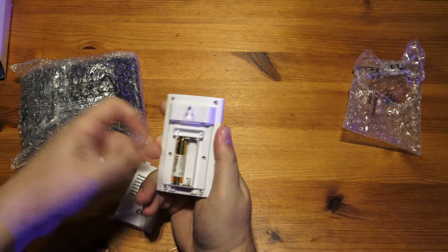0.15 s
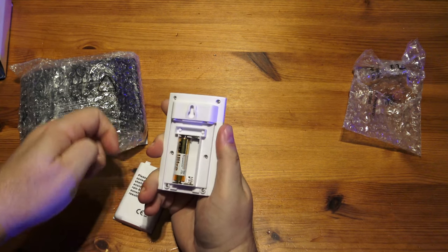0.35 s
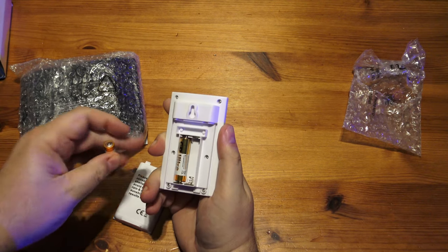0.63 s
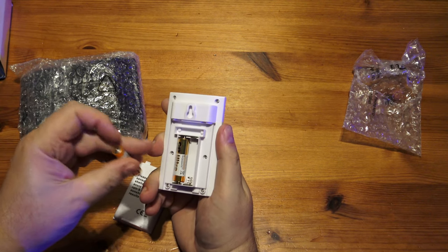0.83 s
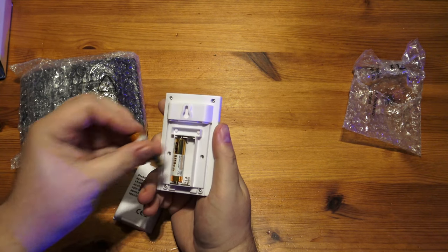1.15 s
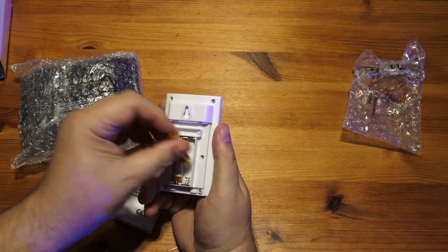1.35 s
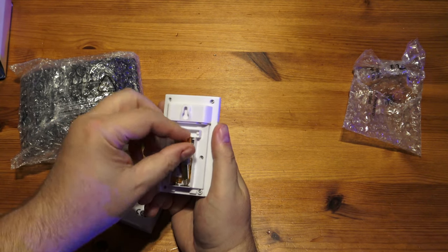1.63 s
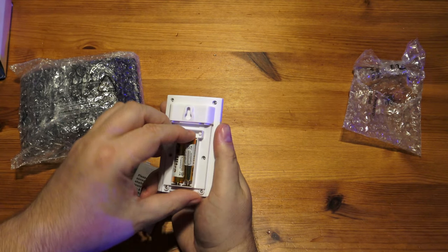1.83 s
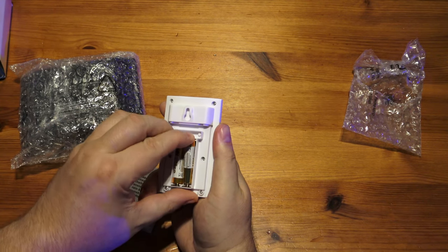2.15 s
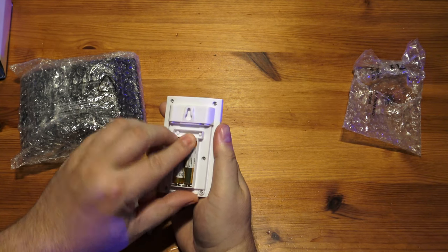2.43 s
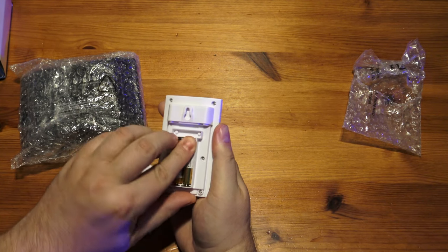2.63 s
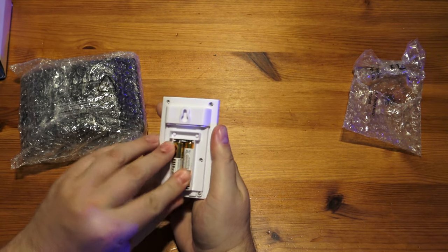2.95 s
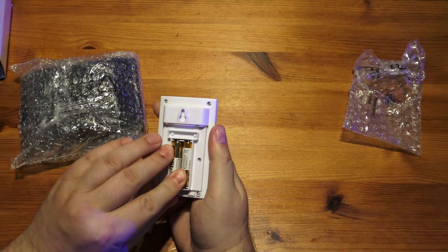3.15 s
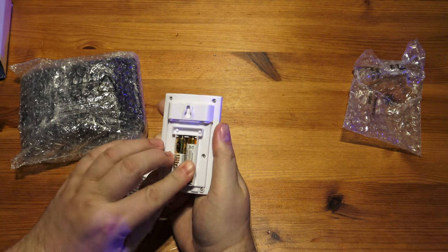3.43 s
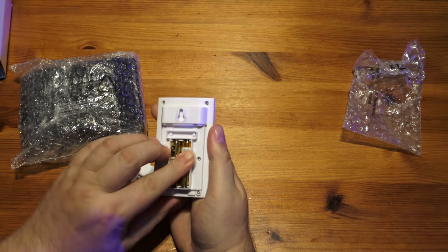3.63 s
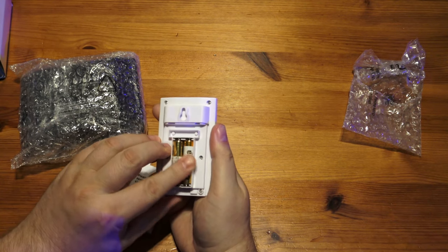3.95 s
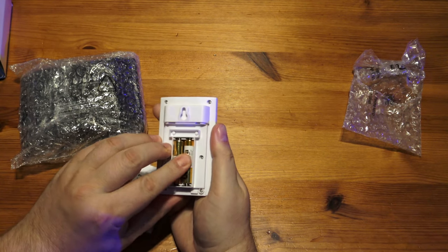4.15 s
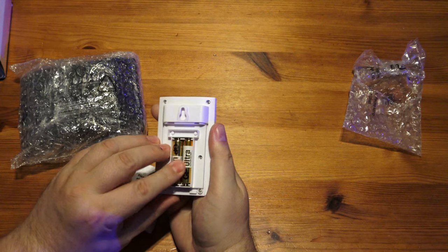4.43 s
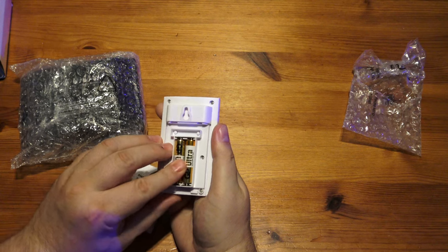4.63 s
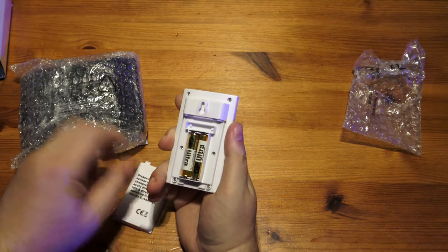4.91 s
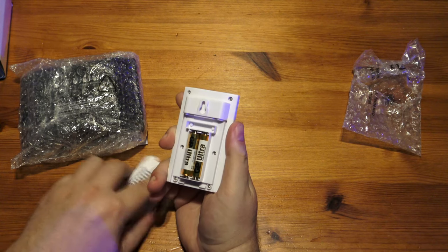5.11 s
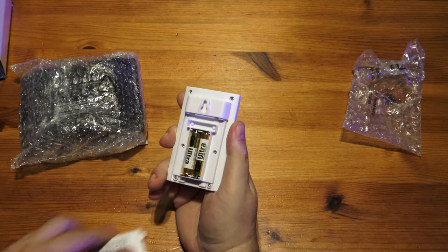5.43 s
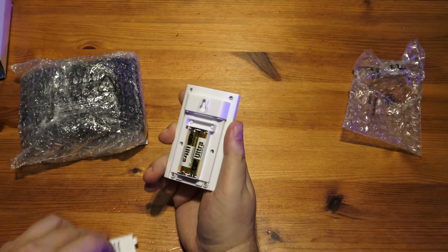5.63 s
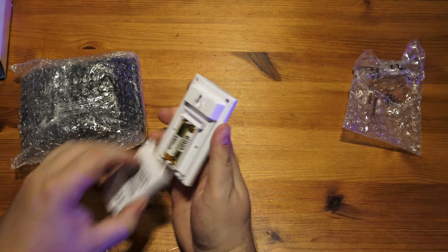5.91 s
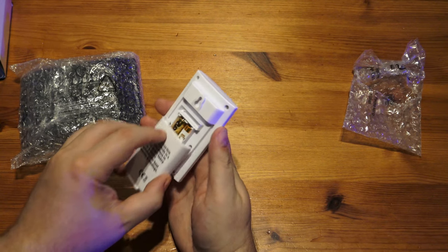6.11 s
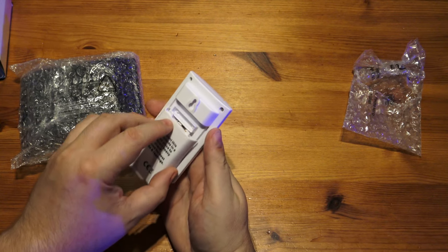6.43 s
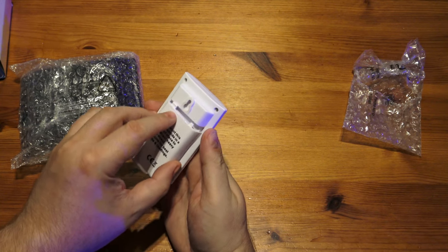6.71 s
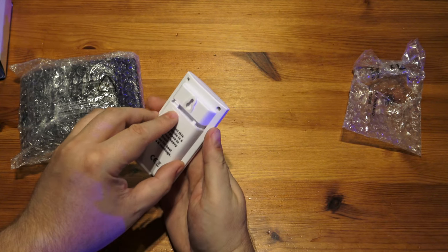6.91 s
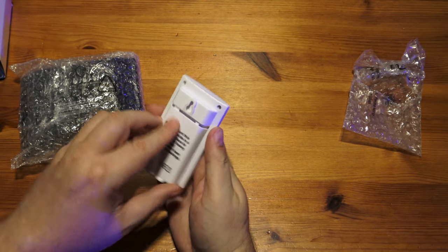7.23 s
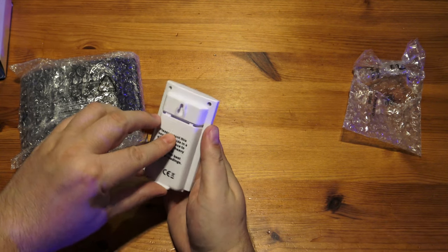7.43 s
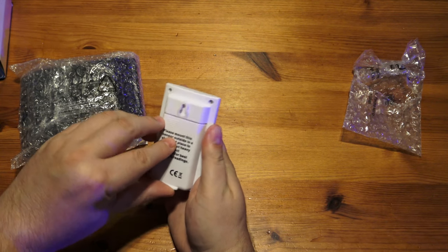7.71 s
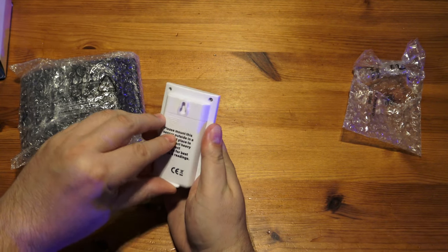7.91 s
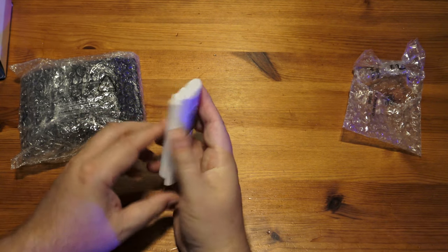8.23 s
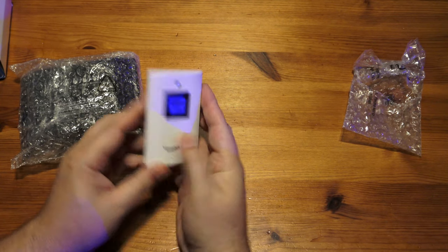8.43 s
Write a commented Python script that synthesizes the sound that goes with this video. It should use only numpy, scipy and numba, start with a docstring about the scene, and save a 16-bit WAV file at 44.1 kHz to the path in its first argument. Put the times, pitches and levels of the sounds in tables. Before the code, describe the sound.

In a small room, close to the microphone, hands press a battery into a light plastic case: a flurry of ticks, then hard, separate snaps and small scuffs. A loose cover knocks and drags grittily over the wooden table, is fitted with several sharp clicks, and settles with a last loud snap. Skin brushes softly; a quiet fan wavers behind, with short echoes.

```python
"""A wooden table in a small room: hands push a battery into a plastic case, drag its cover and snap it on.
Each contact is a short chatter of clicks that rings the plastic; the drag is gritty noise through its modes.
Skin and sleeves brush as patchy noise, a contact spring buzzes, fingers thump and a faint tone pings.
Decaying noise makes the room's echo; a fan wavers in the hush; a fast limiter holds down the loudest snaps."""
import sys
import numpy as np
from scipy import signal
from scipy.fft import rfft, irfft, next_fast_len
from scipy.io import wavfile
from scipy.ndimage import uniform_filter1d
from numba import njit

SR = 44100
rng = np.random.default_rng(int(sys.argv[2]) if len(sys.argv) > 2 else 0)


def transcribe(u):
    """Save the signal u as a 16-bit wav file named by the first command-line argument.

    u: samples, shape (n,) or (channels, n), limited to [-1, 1]; the rate is SR.
    q: integer samples, one column per channel.
    """
    v = np.clip(np.atleast_2d(u).T, -1, 1)
    q = np.round(v * 32767).astype(np.int16)
    wavfile.write(sys.argv[1], SR, q)


N = 377495  # length in samples
SECONDS = np.arange(N) / SR
LEFT_RIGHT = np.array([[1], [-1]])  # side signal: opposite sign in the two channels


def undb(db):
    """dB to gain."""
    return 10 ** (np.asarray(db) / 20)


def along(table, hz):
    """Read a (Hz, value) table on a log axis."""
    f, v = np.transpose(table)
    return np.interp(np.log(hz + 1), np.log(f), v)


def mode(hz, centre_hz, width_hz):
    """Complex response of one resonance, gain 1 at the centre."""
    return 1j * hz * width_hz / (centre_hz ** 2 - hz ** 2 + 1j * hz * width_hz)


def shaped(x, response):
    """Filter by a function of frequency."""
    size = next_fast_len(x.shape[-1])
    hz = np.arange(size // 2 + 1) * SR / size
    return irfft(rfft(x, size) * response(hz), size)[..., :x.shape[-1]]


@njit
def sweep(x, hz, damp):
    """Band-pass whose centre moves every sample."""
    y, band, low = np.empty(len(x)), 0., 0.
    for i in range(len(x)):
        g = np.tan(np.pi * hz[i] / SR)
        v = (band + g * (x[i] - low)) / (1 + g * (g + damp))
        band, low, y[i] = 2 * v - band, low + 2 * g * v, damp * v
    return y


def unit(x):
    """Scale to rms 1."""
    return x / np.sqrt(np.mean(x ** 2))


def grit(size, spread_db):
    """Noise whose samples differ widely in size: dense tiny clicks."""
    return rng.standard_normal(size) * undb(spread_db * rng.exponential(size=size))


def walk(rate):
    """Random levels around zero, a new one every 1 / rate s, slewed from each to the next."""
    hold = int(SR / rate)
    steps = np.repeat(rng.standard_normal(N // hold + 1), hold)
    return uniform_filter1d(steps, hold)[:N]


def curve(rows):
    """Columns of a curve at every sample, and a gate that fades in and out at its ends."""
    s, *columns = np.transpose(rows)
    gate = np.clip(np.minimum(SECONDS - s[0], s[-1] - SECONDS) / 0.0067, 0, 1)
    return [gate] + [np.interp(SECONDS, s, c) for c in columns]


SMALL_HZ = 524  # bass corner of the small shell
TABLE_HZ, TABLE_WIDTH_HZ = 180.2, 110
CREST_DB = 7  # allowance for the peak above the loudest short-time rms
# modes below this follow the hollow one in part, and are weaker where the ring is high
LOW_MODES_HZ, LOW_SHARE, USUAL_HOLLOW_DB = 1500, 0.373, -6.5
LOW_DB_PER_OCTAVE, USUAL_RING_HZ = -2, 2520


def taps(rows, modes, crack_db, near_db, scatter_db, thud_db, click):
    """A first click and a chatter ring the modes; each blow lands at another spot, so mode strengths vary."""
    size = 8192
    out = np.zeros(N + size)
    t, hz = np.arange(size) / SR, np.arange(size // 2 + 1) * SR / size
    small = 1j * hz / (SMALL_HZ + 1j * hz)  # a small shell radiates little bass
    for start_s, level_db, hollow_db, treble_db, ring_hz, chatter_ms in rows:
        u = 1000 * t / max(chatter_ms, 2)  # time in chatter lengths
        fall = np.exp(-u) + .1 * np.exp(-u / 3)
        push = grit(size, 2.5) * (1 - np.exp(-u / .4)) * fall
        push[30] += click  # one sharp click near the start

        spot = undb(scatter_db * rng.standard_normal(len(modes)))
        low_db = LOW_SHARE * (hollow_db - USUAL_HOLLOW_DB)
        low = undb(low_db + LOW_DB_PER_OCTAVE * np.log2(ring_hz / USUAL_RING_HZ))
        crack = undb(crack_db) * mode(hz, 2300, 3655)
        shell = crack + undb(near_db) * mode(hz, ring_hz, 0.15 * ring_hz)
        for g, (f, w, db) in zip(spot[1:], modes[1:]):
            shell = shell + g * undb(db) * (low if f < LOW_MODES_HZ else 1) * mode(hz, f, w)

        hollow = mode(hz, *modes[0][:2]) * small
        parts = [(shell * small * mode(hz, 2465, 4003), 0),
                 (shell * mode(hz, 7376, 9000) ** 2, treble_db),
                 (hollow, hollow_db),
                 (mode(hz, TABLE_HZ, TABLE_WIDTH_HZ), thud_db + hollow_db)]
        at = int(start_s * SR)
        for response, db in parts:
            wave = irfft(rfft(push) * response, size)
            loudest = np.sqrt(uniform_filter1d(wave ** 2, size=300).max())
            out[at:at + size] += wave * undb(level_db - CREST_DB + db) / loudest
    return out[:N]


# plastic case resonances: mode_hz, width_hz, level_db; the first is the hollow one, levelled by each tap
CASE_MODES = [(597.4, 58, 0), (999, 180, 12.5), (1300, 490, 3.5), (1800, 510, -6), (2304, 72, 2),
              (2940, 79, -12), (3610, 760, -2.5), (5010, 600, -9.5), (6290, 100, 1), (8700, 2500, -17.5)]
# hard taps and snaps: start_s, level_db (before the crest allowance), hollow_db and treble_db
# (relative to the level), ring_hz (strongest ring)
CASE_HITS = [(0.127, -57.5, 12, 15.5, 6300), (1.456, -36, -29, -9, 4840), (1.491, -24, -2, -32, 4624),
             (1.504, -31, 1.5, -20, 2900), (1.519, -29, -3.5, -24.5, 2930),
             (1.532, -26.5, -8.5, -27.5, 3150), (1.547, -20, -12, -15, 3050),
             (1.559, -28.5, -10, -18, 2870), (1.567, -34, -18, -2, 3000), (1.59, -40, -13, 1, 5200),
             (1.7229, -6.5, -8, -27, 3000), (1.947, -9, -3, -16.5, 1210), (2.237, -29, -1.5, -0.5, 4880),
             (2.388, -31.5, -7.5, -7.5, 1770), (2.5262, 5, -16, -12, 3850), (3.255, -27, -12, 14, 3480),
             (3.727, -14, -13.5, -22, 3850), (4.0, -28.5, -23, -28, 3860), (4.024, -43.5, 13.5, -14, 3900),
             (4.27, -47, -7, -3, 5020), (4.472, -41, 4.5, -10, 4200), (4.745, -50.5, 4, 2, 7100),
             (4.806, -49.5, 5, 12.5, 4140), (4.051, -36, -4, -17, 3970), (4.36, -49.5, -14, 3.5, 4170),
             (6.302, -38, -7.5, -27, 4000), (6.486, -47, 10.5, 1, 1040), (6.533, -20, -3.5, -39, 4804),
             (6.674, -33.5, -4.5, -10, 1010), (6.726, -31, 6, -3, 3950), (6.733, -7.5, -19.5, -10, 3980),
             (6.81, -19, -11.5, -6.5, 2225), (6.986, -9, -11, -18, 1640), (6.9964, 0.5, -28, -4.5, 1870),
             (7.148, -32, -1.5, -11.5, 1880), (7.6884, -9.5, -11, -6.5, 1300), (7.824, 6, -19, -4.5, 2150)]
CASE_TAP_MS = 3.79  # chatter decay
# short scuffs along the case: start_s, level_db (before the crest allowance), ring_hz, chatter_ms
SCUFFS = [(0.545, -49.5, 6030, 6.3), (1.404, -45.5, 6460, 7.4), (1.68, -31.5, 3160, 11),
          (2.515, -26, 3700, 6), (3.305, -44, 4300, 20.5), (3.338, -33.5, 3930, 19), (3.625, -38, 5460, 16),
          (3.72, -22.5, 3740, 7.3), (4.248, -42.5, 3655, 4), (4.444, -32.5, 4136, 9.4),
          (4.78, -43.5, 3780, 14), (6.12, -39.5, 2470, 26), (6.145, -41, 4400, 18), (7.815, -28, 2350, 4.4),
          (8.133, -41, 2630, 10.4), (8.185, -42.5, 2400, 5)]
SCUFF_HOLLOW_DB, SCUFF_TREBLE_DB = -12, -3.5


def case():
    """Battery and case ring in taps that share one short chatter, and scuffs that share one colour."""
    rows = [(*row, CASE_TAP_MS) for row in CASE_HITS]
    scuffs = [(s, db, SCUFF_HOLLOW_DB, SCUFF_TREBLE_DB, hz, ms) for s, db, hz, ms in SCUFFS]
    hits = taps(rows, CASE_MODES, crack_db=0.41, near_db=9.4, scatter_db=3.5, thud_db=-23.5, click=5.15)
    return hits + taps(scuffs, CASE_MODES, crack_db=-3, near_db=16, scatter_db=2.2, thud_db=-19, click=1.0)


# loose cover resonances: mode_hz, width_hz, level_db; the first is the hollow one, levelled by each knock
COVER_MODES = [(316, 25, 0), (824, 640, 9.5), (1216, 240, 7), (1726, 33, 7), (2150, 42, -2),
               (3040, 150, -5.5), (4270, 550, -13), (5150, 50, 0), (6580, 300, -6), (8000, 620, -8)]
# cover knocks on the table: start_s, level_db (before the crest allowance), ring_hz (strongest ring),
# chatter_ms (decay, held to 2 ms or more)
COVER_KNOCKS = [(5.148, -23, 2080, 11), (5.153, -16, 1220, 9.8), (5.179, -21.5, 1180, 2.3),
                (5.377, -12, 3100, 4.9), (5.418, -19, 2870, 8.8), (5.586, -31, 1460, 4.5),
                (5.757, -34.5, 2280, 2.5)]
COVER_HOLLOW_DB, COVER_TREBLE_DB = -26, -29


def cover():
    """Knocks of the loose cover ring its modes, all of one colour."""
    rows = [(s, db, COVER_HOLLOW_DB, COVER_TREBLE_DB, hz, ms) for s, db, hz, ms in COVER_KNOCKS]
    return taps(rows, COVER_MODES, crack_db=-42.0, near_db=1.7, scatter_db=0.95, thud_db=-7.0, click=1.3)


# cover dragged over the wood, a continuous curve: time_s, level_db, treble_db (relative to the level)
DRAG_CURVE = [(5.14, -32, -12), (5.258, -38, -13), (5.27, -34.5, -9.5), (5.345, -28, -7),
              (5.368, -39.5, -15), (5.395, -27.5, -10), (5.51, -32, -8.5), (5.58, -50.5, -14),
              (5.6, -33.5, 3), (5.72, -77, -4)]
GAP_HZ, GAP_SAG_HZ_PER_S, GAP_ENDS_S = 3310, 1260, 5.575


def drag():
    """Plastic edge stutters over the wood grain; the gap under the tilting cover adds a sinking resonance."""
    gate, level_db, treble_db = curve(DRAG_CURVE)
    since = np.clip(SECONDS - DRAG_CURVE[0][0], 0, 1)
    gap_hz = GAP_HZ - GAP_SAG_HZ_PER_S * since + 150 * walk(15)
    slip = grit(N, 1.5) * undb(1.8 * walk(70))
    body = 0
    for f, w, db in COVER_MODES[1:]:  # the grip shifts, so each mode comes and goes
        body = body + undb(db + 6.5 * walk(14)) * shaped(slip, lambda hz: mode(hz, f, w))
    gap = unit(sweep(slip, gap_hz, .13)) * (SECONDS < GAP_ENDS_S)
    hiss = unit(shaped(slip, lambda hz: mode(hz, 4300, 4500) ** 2))
    treble = gap + undb(-12) * hiss
    return gate * undb(level_db) * (unit(body) + undb(treble_db) * treble)


# skin and sleeves brushing: start_s, level_db, low_db (relative to the level), swell_s,
# fall_s (time to fall 20 dB)
STROKES = [(0.1, -65, 8.5, 0.05, 1.5), (2.72, -53.5, -12.5, 0.11, 0.29), (3.501, -51, -10, 0.19, 0.1),
           (5.74, -57, 0, 0.017, 24), (7.249, -54.5, -11, 0.086, 0.4), (8.05, -50, -12, 0.2, 2.5)]
BRUSH_LONGEST_S = 0.8


def brush():
    """Soft patchy friction of skin on plastic (high) and forearms on the table (low), swelling and fading."""
    grain = grit(N, 2.2) * undb(2 * walk(25))
    rub = sweep(grain, 2450 + 150 * walk(6), .15) * undb(4 * walk(10))  # the grip shifts
    high = undb(2.0) * rub + undb(-2.5) * shaped(grain, lambda hz: mode(hz, 5650, 6500))
    patchy = rng.standard_normal(N) * undb(0.95 * walk(18))
    low = shaped(patchy, lambda hz: mode(hz, 550, 640))
    high, low = unit(high), unit(low)
    out = 0
    for start_s, level_db, low_db, swell_s, fall_s in STROKES:
        since = SECONDS - start_s
        swell = np.clip(since / swell_s, 0, 1)
        fall = undb(-20 * np.clip(since - swell_s, 0, None) / fall_s)
        lift = np.clip((BRUSH_LONGEST_S - since) / 0.22, 0, 1)  # fade that ends each stroke
        out = out + swell * fall * lift * undb(level_db) * (high + undb(low_db) * low)
    return out


# plucks of the contact spring: start_s, strength_db
PLUCKS = [(3.255, 0), (3.339, -14)]
SPRING_HZ, SPRING_WIDTH_HZ, SPRING_BUZZ_S = 5760, 72, 0.0081
TIZZ_HZ, TIZZ_DB = 13000, -14


def spring():
    """The steel contact buzzes on one thin line, with a bright tizz, when plucked."""
    plucks = np.zeros(N)
    t = np.arange(SR // 20) / SR
    for start_s, strength_db in PLUCKS:
        buzz = rng.standard_normal(len(t)) * np.exp(-t / SPRING_BUZZ_S)
        plucks[int(start_s * SR):][:len(buzz)] = undb(strength_db) * buzz

    def ring(hz):
        tizz = undb(TIZZ_DB) * mode(hz, TIZZ_HZ, TIZZ_HZ / 2) ** 2
        return mode(hz, SPRING_HZ, SPRING_WIDTH_HZ) + tizz
    return shaped(plucks, ring)


# fingers landing on the table: start_s, level_db
LANDINGS = [(5.105, -36)]
THUMP_HZ, THUMP_WIDTH_HZ, THUMP_FADE_MS = 254, 360, 44


def thump():
    """Fingers land on the table beside the cover: a dull low rumble of decaying noise."""
    low = unit(shaped(rng.standard_normal(N), lambda hz: mode(hz, THUMP_HZ, THUMP_WIDTH_HZ) ** 2))
    out = 0
    for start_s, level_db in LANDINGS:
        ms = 1000 * (SECONDS - start_s)
        out = out + undb(level_db) * low * np.clip(ms / 3, 0, 1) * np.exp(-np.abs(ms) / THUMP_FADE_MS)
    return out


# faint short tones: start_s
PING_STARTS = [0.1265, 0.877, 3.598, 4.209, 4.962, 6.322]
PING_HZ, PING_T60_S, PING_DB = 1609, 0.25, -56.5


def pings():
    """A faint short tone now and then: a sine with a soft onset and exponential decay."""
    out, t = np.zeros(N + SR), np.arange(SR) / SR
    tone = np.sin(2 * np.pi * PING_HZ * t) * 1000 ** (-t / PING_T60_S) * (1 - np.exp(-t / 0.0038))
    for start_s in PING_STARTS:
        out[int(start_s * SR):][:SR] += undb(PING_DB) * tone
    return out[:N]


# room decay time, to fall 60 dB: band_hz, t60_s
DECAY = [(300, 0.36), (1500, 0.3), (4000, 0.29), (12000, 0.26)]
# side level of echo and hush: band_hz, side_db (relative to mid); the side nearly vanishes near 2.6 kHz
WIDTH = [(60, -9), (300, -7.5), (1300, -7.5), (2600, -47), (7000, -1.5), (15000, -14)]
ROOM_DB, ROOM_SIDE_DB = -8, -9.5
ROOM_FILL_S, ROOM_EARLY = .028, 0.6  # time to thicken, and the gain it thickens from


def room(x):
    """Echoes thicken over the first moments, then die away, the treble first."""
    t = np.arange(int(.6 * SR)) / SR
    tail = 0
    for hz in 125 * 2 ** np.arange(0, 7.1, .5):  # half-octave bands
        band = shaped(rng.standard_normal((2, len(t))), lambda f: mode(f, hz, hz / 2))
        tail = tail + band * 1000 ** (-t / along(DECAY, hz))
    tail = tail * (ROOM_EARLY + (1 - ROOM_EARLY) * np.clip(t / ROOM_FILL_S, 0, 1) ** 2)
    tail = tail / np.sqrt(np.sum(tail[0] ** 2))
    mid, side = signal.fftconvolve(x[None], tail, axes=1)[:, :N]
    side = shaped(side, lambda hz: undb(along(WIDTH, hz) + ROOM_SIDE_DB))
    return undb(ROOM_DB) * (mid + side * LEFT_RIGHT)


# colour of the hush: band_hz, density_db (relative; the rms is set by QUIET_DB)
HUSH_COLOUR = [(15, -6), (25, -9), (217, -7.5), (373, -7.5), (575, -8.5), (754, -9), (1070, -7),
               (1370, -15), (3920, -19), (16000, -25)]
QUIET_DB = -60  # rms of the mid hush before the fan is added
# fan bands: centre_hz, width_hz (of a resonance applied twice), level_db (above the hush)
FAN_BANDS = [(46.24, 33.9, 9), (241.54, 130.6, 7.5), (1043, 110, 6)]


def hush():
    """Room hush and microphone hiss as coloured noise, with the wavering bands of a fan."""
    def colour(hz):
        return undb(along(HUSH_COLOUR, hz))
    mid = shaped(rng.standard_normal(N), colour)
    side = shaped(rng.standard_normal(N), lambda hz: colour(hz) * undb(along(WIDTH, hz)))
    scale = undb(QUIET_DB) / np.sqrt(np.mean(mid ** 2))
    for f, w, level_db in FAN_BANDS:
        band = shaped(rng.standard_normal(N), lambda hz: colour(hz) * mode(hz, f, w) ** 2)
        mid = mid + undb(level_db + 3.71 * walk(17)) * band
    return scale * (mid + side * LEFT_RIGHT)


MIC_HIGH_HZ = 8563


def scene():
    """Everything near the hands, its echo, and the hush."""
    near = case() + cover() + drag() + brush() + spring() + thump() + pings()
    near = shaped(near, lambda hz: 1 / (1 + 1j * hz / MIC_HIGH_HZ) ** 2)  # the microphone dulls the top
    # the two capsules hear the top end a little differently
    apart = undb(-17) * shaped(near, lambda hz: 1j * mode(hz, 9000, 7000))
    return near + apart * LEFT_RIGHT + room(near) + hush()


@njit
def follow(x, attack, release):
    """Level follower, quick up and slower down."""
    level, out = 0., np.empty(len(x))
    for i in range(len(x)):
        level += (x[i] - level) * (attack if x[i] > level else release)
        out[i] = level
    return out


LIMIT_DB, LIMIT_RATIO, ATTACK_S, RELEASE_S = -11.5, 6.3, 0.00017, 0.0028
TOP_HZ = 15900


def record(dry):
    """A quick limiter ducks loud snaps, so their echo seems larger; then the top is cut."""
    attack, release = min(1, 1 / (ATTACK_S * SR)), 1 / (RELEASE_S * SR)
    level = follow(np.abs(dry).max(axis=0), attack, release)
    gain = np.minimum(1, undb(LIMIT_DB) / (level + 1e-9)) ** (1 - 1 / LIMIT_RATIO)
    top_cut = signal.ellip(10, .2, 70, TOP_HZ, fs=SR, output="sos")
    return signal.sosfilt(top_cut, dry * gain)


dry = scene()
out = record(dry)
transcribe(out)
```